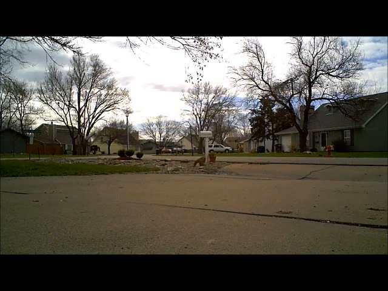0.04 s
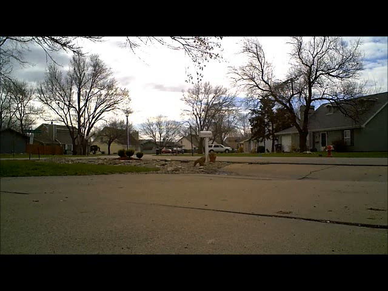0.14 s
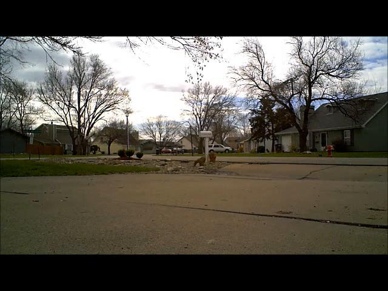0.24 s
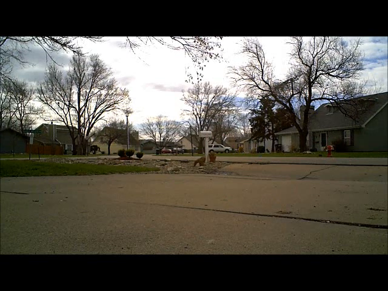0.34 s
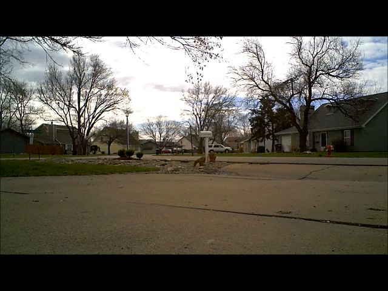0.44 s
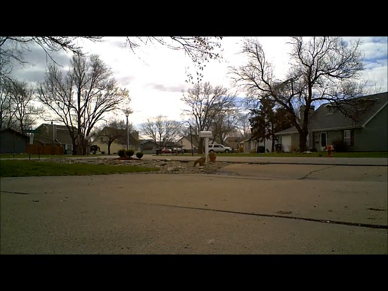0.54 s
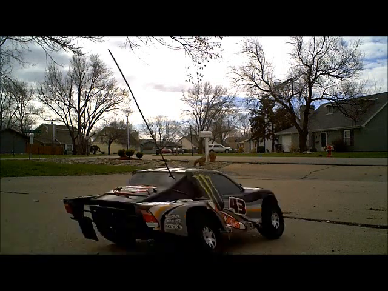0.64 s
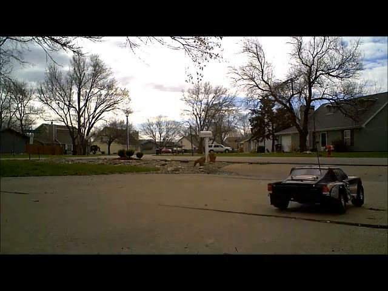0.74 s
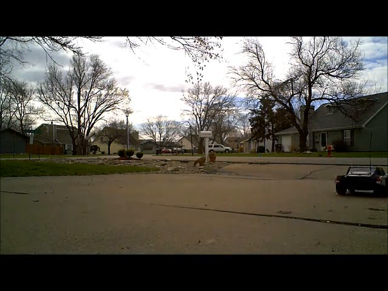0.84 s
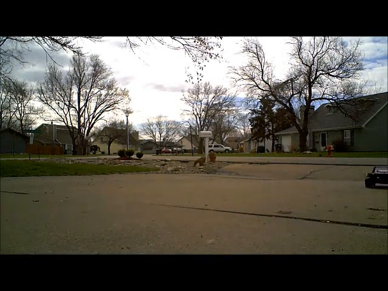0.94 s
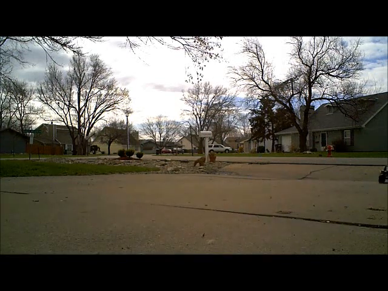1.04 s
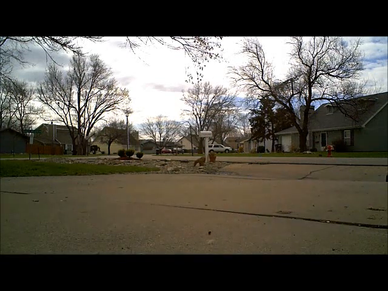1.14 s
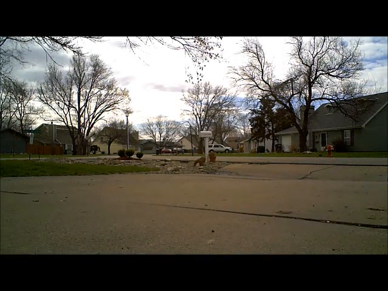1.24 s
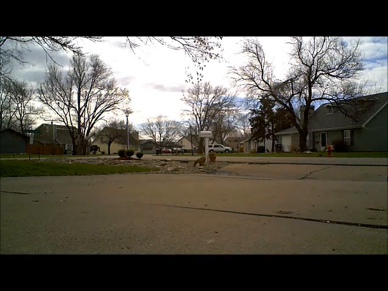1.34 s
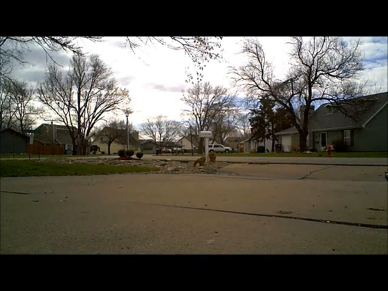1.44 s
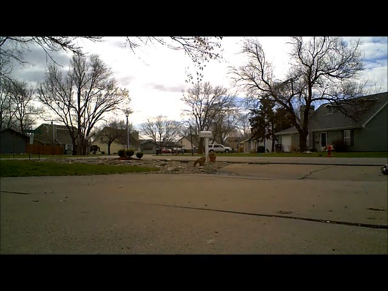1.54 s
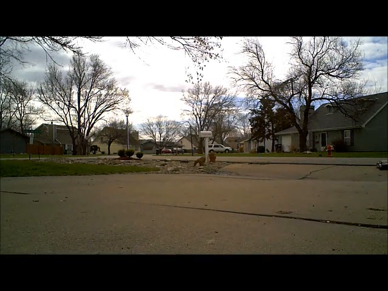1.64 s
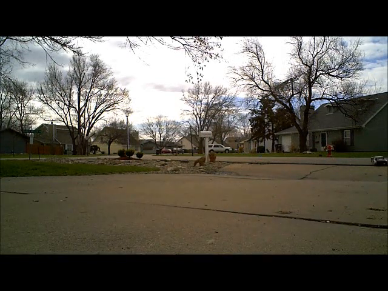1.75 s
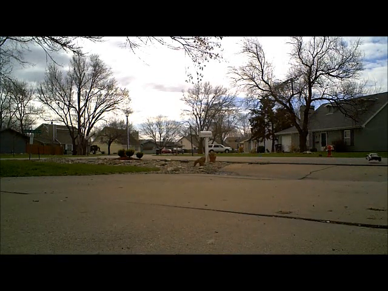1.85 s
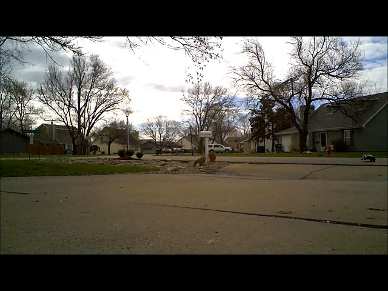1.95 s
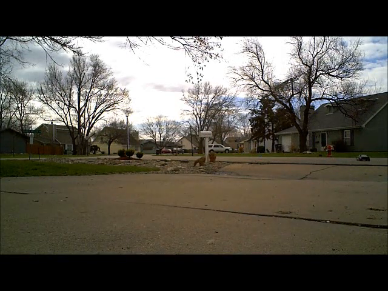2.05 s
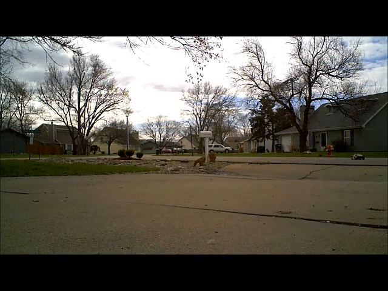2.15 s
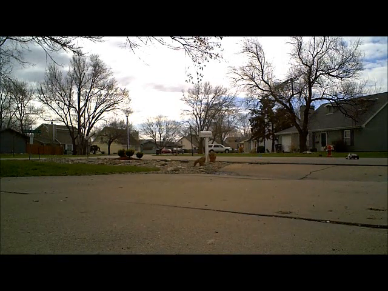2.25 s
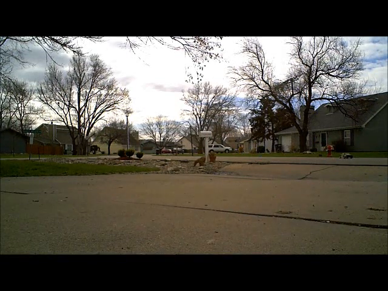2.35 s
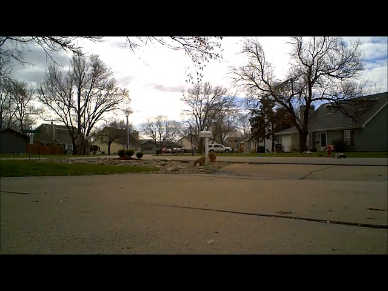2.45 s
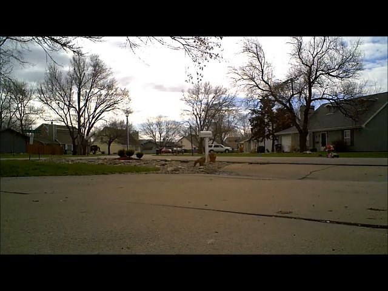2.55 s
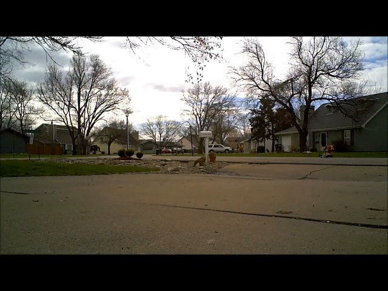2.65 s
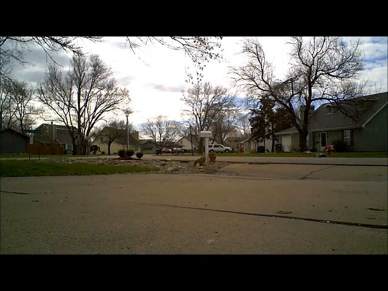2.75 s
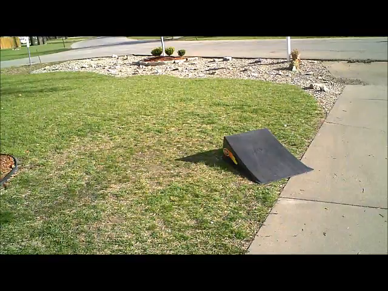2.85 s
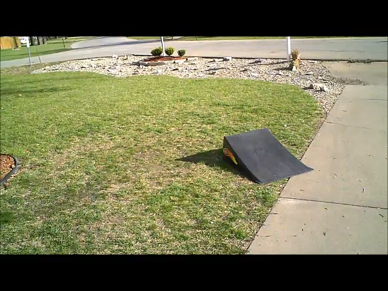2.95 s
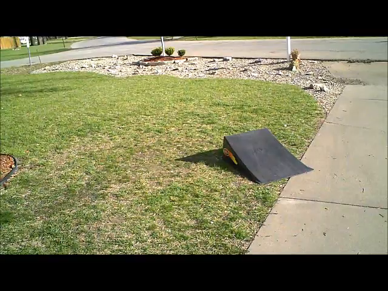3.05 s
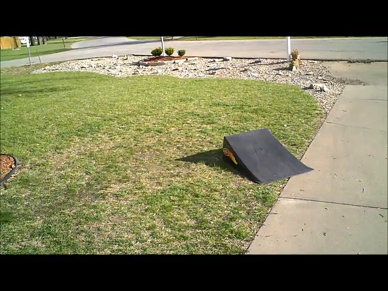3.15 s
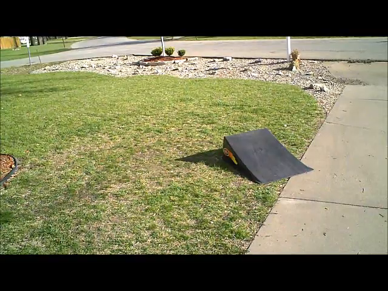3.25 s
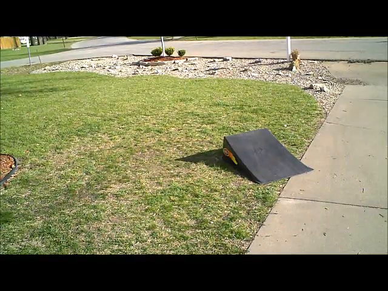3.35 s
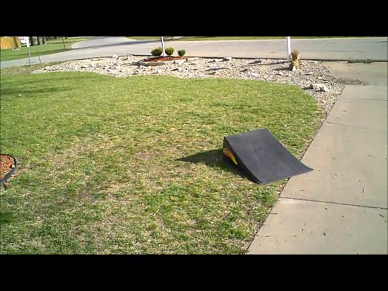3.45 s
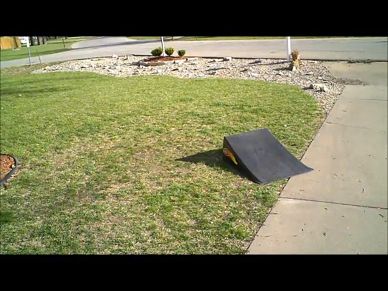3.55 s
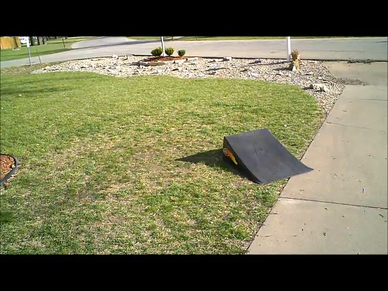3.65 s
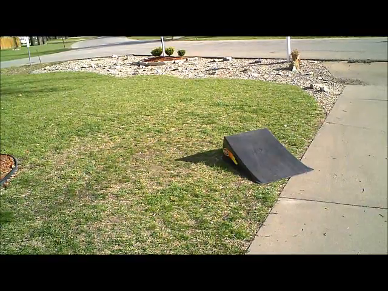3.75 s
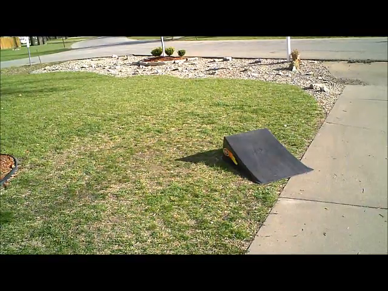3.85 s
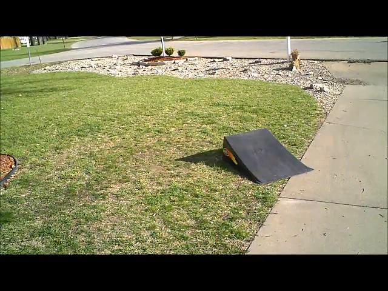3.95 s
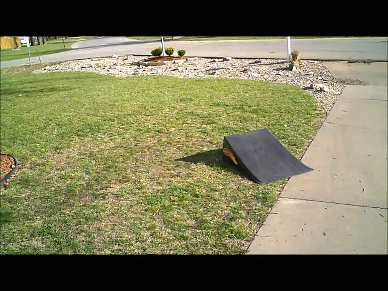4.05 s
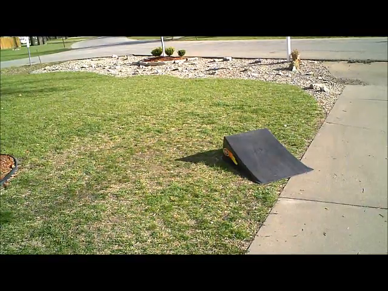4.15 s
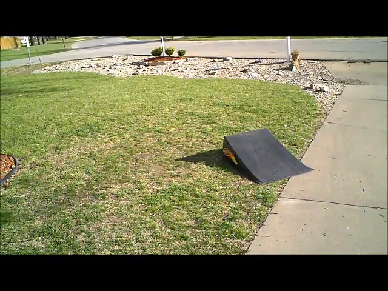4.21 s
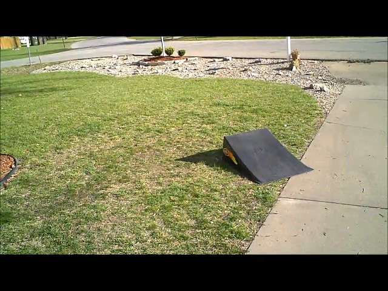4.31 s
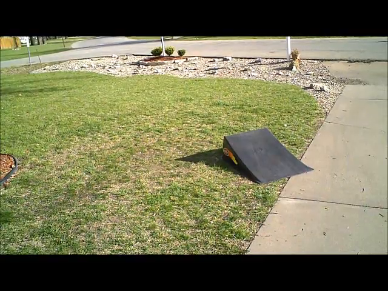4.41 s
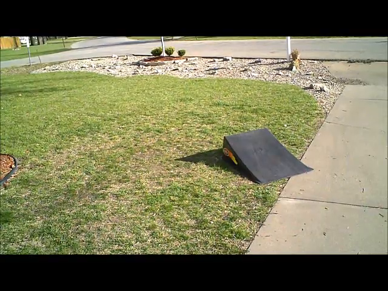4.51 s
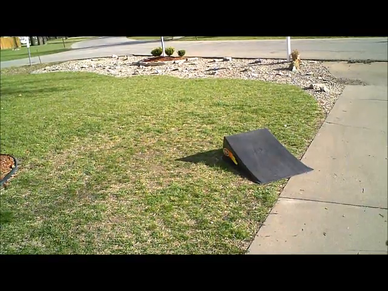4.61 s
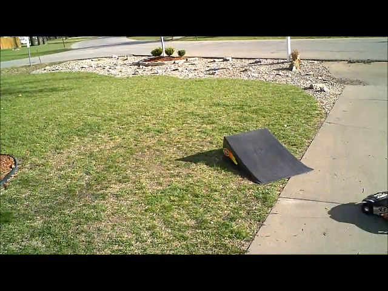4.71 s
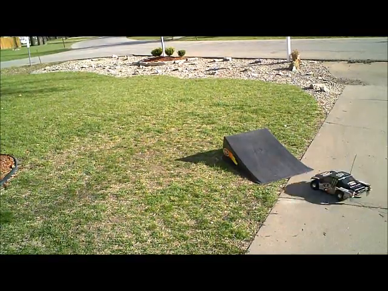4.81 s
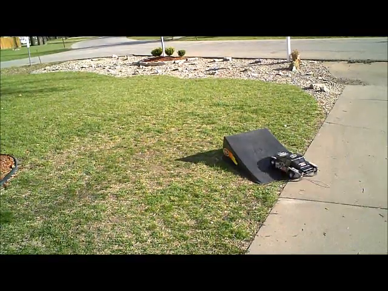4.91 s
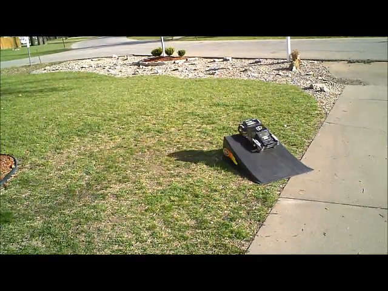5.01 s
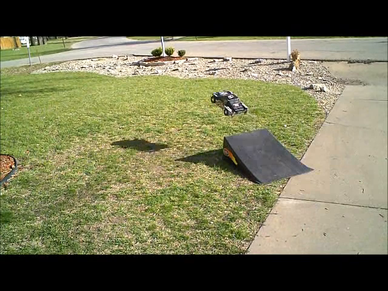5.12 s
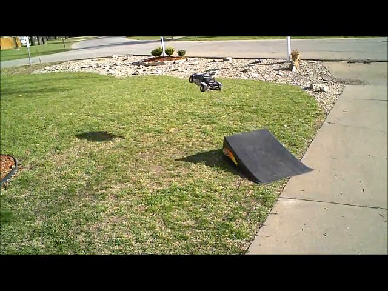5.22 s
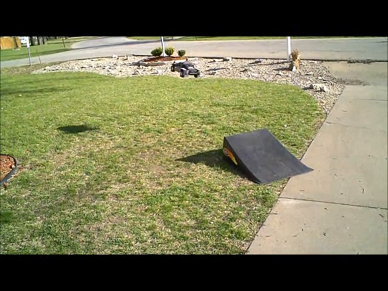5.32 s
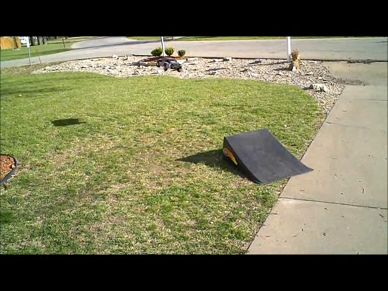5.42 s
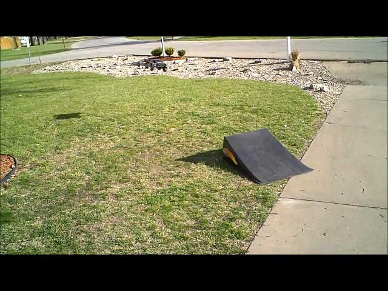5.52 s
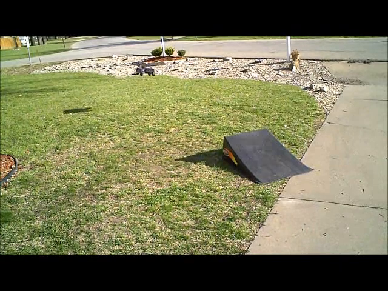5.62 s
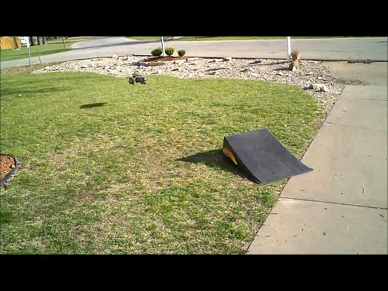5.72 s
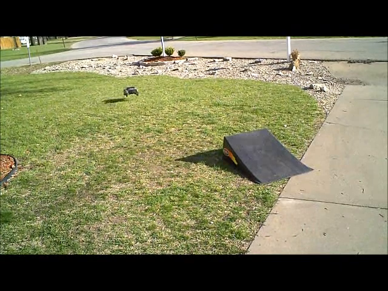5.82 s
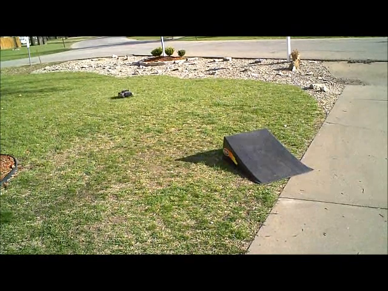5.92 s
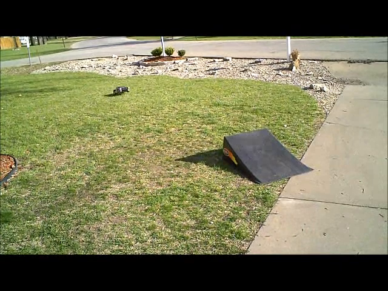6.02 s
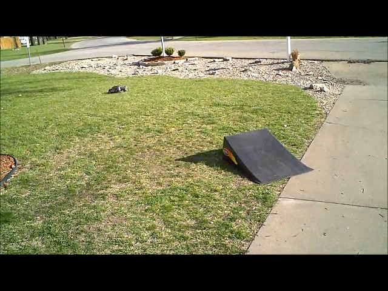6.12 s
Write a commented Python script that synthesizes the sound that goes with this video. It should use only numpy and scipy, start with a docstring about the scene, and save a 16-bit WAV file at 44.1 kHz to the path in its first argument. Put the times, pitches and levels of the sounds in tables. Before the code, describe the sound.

Rising gear whine and tyre roar as a remote-controlled truck races by, rattles away, then speeds up again and jumps a hollow ramp.

```python
"""A gear whine and tyre roar race past and rattle away: a small electric truck on cracked asphalt.
In a second place it accelerates up a drive, hits a plastic ramp, revs in the air and lands on grass.
Gear teeth whine at motor speed, knobbly tyres roar and squeal, the plastic chassis knocks.
Wind puffs on the microphone; a far bird chirps twice."""
import sys
import numpy as np
from scipy import signal
from scipy.io import wavfile
from scipy.ndimage import map_coordinates

SR = 44100
rng = np.random.default_rng(int(sys.argv[2]) if len(sys.argv) > 2 else 0)


def file_out(sig):
    """Save sig as 16-bit WAV at sys.argv[1]."""
    # one column per channel
    cols = np.atleast_2d(sig).T
    # limit, then scale
    lim = np.clip(cols, -1, 1)
    pcm = np.round(lim * 32767).astype(np.int16)
    wavfile.write(sys.argv[1], SR, pcm)


N = 272184
TIME = np.arange(N) / SR
SECOND_PLACE_S = 2.88
MID_MESH_HZ, CUTOFF_HZ = 4000, 15780

# motor speed and tooth load in each run: t/s, mesh f/Hz, load/dB
PASS_BY = [(0, 3687, 5.5), (.17, 3847, 2.5), (.265, 4300, -1), (.298, 5710, 7.5), (.33, 6190, -2),
           (.5, 6830, -14.5), (.62, 6970, -6.5), (.67, 7060, 9), (.74, 7130, 6.5), (.8, 6730, -32.5),
           (.9, 6430, -5), (1.4, 6070, -21)]
RUN_UP = [(3.1, 616.4, -3.5), (3.201, 746.4, 7.5), (3.32, 795, 1), (3.418, 972, 2), (3.47, 1210, 5),
          (3.539, 1278, 3), (3.651, 1494, 4.5), (3.798, 1737, -2), (3.998, 2550, 1.5), (4.13, 2907, 2.5),
          (4.222, 3123, -3), (4.302, 3544, -6.5), (4.421, 3896, -7), (4.601, 4265, -8), (4.899, 4948, -5.5),
          (5.013, 6610, 3.5), (5.054, 4904, -3), (5.109, 5165, -10), (5.159, 5242, 2.5), (5.201, 5500, -48)]
AIRBORNE = [(5.329, 2597, -11), (5.376, 3293, 6), (5.42, 4190, -5), (5.461, 4676, -10), (5.55, 3610, -34),
            (5.632, 3630, -1.5), (5.799, 4515, 0), (5.97, 4420, -12)]
# rolling truck, near or far: t/s, level/dB, treble level/dB
ROLLING = [(0, -52, -72), (.17, -50.5, -68.5), (.26, -44, -64.5), (.46, -38.5, -50.5), (.6, -34.5, -42.5),
           (.72, -32.5, -26.5), (.79, -33.5, -37.5), (.84, -42, -51), (1.06, -47.5, -54.5),
           (1.42, -53, -59), (1.75, -52.5, -67), (2.25, -61, -80.5), (2.88, -64.5, -77.5),
           (3.6, -60, -76.5), (3.93, -54, -63.5), (4.56, -50, -56), (4.9, -49, -52.5), (5.09, -44.5, -46.5),
           (5.16, -48, -52), (5.21, -56.5, -66), (5.3, -61, -66), (5.39, -54, -56.5), (5.5, -58.5, -64),
           (5.95, -60.5, -65.5), (6.0, -54, -53.5), (6.17, -62.5, -96)]


def amp(db):
    """dB to gain."""
    return 10 ** (np.asarray(db) / 20)


def unit_rms(x):
    """Scale to rms 1."""
    return x / np.sqrt(np.mean(x ** 2) + 1e-20)


def butter(x, hz, kind, order=2):
    """Butterworth filter."""
    return signal.sosfilt(signal.butter(order, hz, kind, fs=SR, output="sos"), x)


def curves(rows):
    """Columns after t/s, interpolated to every sample."""
    s, *columns = np.transpose(rows)
    return [np.interp(TIME, s, column) for column in columns]


def gate(rows, fade_s=0.13):
    """1 while a curve lasts, fading beyond its ends."""
    return np.clip(np.minimum(TIME - rows[0][0] + fade_s, rows[-1][0] + fade_s - TIME) / fade_s, 0, 1)


def bumps(rows):
    """Sum of smooth humps: centre/s, length/s, height."""
    return sum(height * np.sin(np.pi * np.clip((TIME - s) / length_s + .5, 0, 1)) ** 2
               for s, length_s, height in rows)


def wander(rate_hz):
    """Smooth random curve, spread about 1."""
    steps = np.cumsum(np.broadcast_to(np.clip(rate_hz, 1, 3000), N)) / SR
    return map_coordinates(rng.standard_normal(20000), [steps + 5], order=3)


def ring(clicks, hz, t60_s):
    """One mode: a unit click rings a decaying sine of height 1."""
    r, w = amp(-60 / (t60_s * SR)), 2 * np.pi * hz / SR
    return signal.lfilter([0, np.sin(w)], [1, -2 * r * np.cos(w), r * r], clicks + 1e-18)


def blurred_tone(hz, width_hz, clean):
    """Tone with a steady power share `clean`; the rest scatters in level and phase."""
    phasor = np.exp(2j * np.pi * np.cumsum(hz) / SR)
    scatter = (wander(width_hz) + 1j * wander(width_hz)) / np.sqrt(2)
    tone = np.sqrt(2) * np.real(phasor * (np.sqrt(clean) + np.sqrt(1 - clean) * scatter))
    return tone * (hz < CUTOFF_HZ)


def banded(spectrum, source, flicker_db):
    """Grains through ten flickering bands; rms 1."""
    hz, db = np.transpose(spectrum)
    common, out = wander(45), 0
    edges_hz = np.geomspace(hz[0], hz[-1], 11)
    for k, (low, high) in enumerate(zip(edges_hz, edges_hz[1:])):
        band = butter(source[k % 2], [low, high], "band")
        level_db = np.interp(np.log(low * high) / 2, np.log(hz), db)
        out += band * amp(level_db + flicker_db * (common + .4 * wander(15)))
    return unit_rms(out)


def resonant(peaks, source, flicker_db):
    """Grains twice through each flickering resonance; rms 1."""
    common, out = wander(70), 0
    for k, (hz, width_hz, db) in enumerate(peaks):
        t60_s = np.log(1000) / (np.pi * width_hz * 1.3)
        peak = ring(ring(source[k % 2], hz, t60_s), hz, t60_s)
        out += unit_rms(peak) * amp(db + flicker_db * (common + 0.92 * wander(4.366)))
    return unit_rms(butter(out, .6 * peaks[0][0], "high"))


def passed(level_at_s=0.73, turn_s=0.064):
    """0 while the truck approaches, 1 once it shows its tail."""
    return (1 + np.tanh((TIME - level_at_s) / turn_s)) / 2


def gears(run, partials, blurs, idler_db=None):
    """Mesh tone, harmonics and slower gears follow the motor; slow teeth ring clear, fast ones scatter."""
    # wheels lose grip, motor races: centre/s, rise/share of speed, length/s
    skips = [(0.541, 0.078, 0.057), (0.591, 0.057, 0.061), (0.679, 0.058, 0.1), (0.772, 0.24, 0.054),
             (3.365, .2, 0.048), (3.583, 0.077, 0.048), (3.88, 0.0632, 0.07), (3.958, 0.0528, 0.0524),
             (4.215, 0.074, 0.052), (4.549, 0.088, 0.11), (5.125, 0.29, 0.071)]
    # gear case response: f/Hz, gain/dB
    case = [(1000, 10.5), (1550, 10.5), (2000, -8), (2600, -2), (3000, 4.5), (3700, 0.5), (4200, 0.5),
            (4800, 2), (5600, -0.5), (7300, 3.5), (9500, -3), (14000, -26)]
    # slow motor cogs, teeth let go: centre/s, length/s, dip/dB
    cogging = [(3.165, 0.09, -18), (3.245, 0.1, -26), (3.335, 0.024, -17), (3.39, 0.023, -7),
               (3.44, 0.069, -11)]
    mesh_hz, load_db = curves(run)
    racing = 1 + bumps([(s, length_s, rise) for s, rise, length_s in skips])
    mesh_hz = mesh_hz * racing * (1 + .019 * wander(80))
    case_hz, case_db = np.transpose(case)
    level_db = curves(ROLLING)[0] + bumps(cogging)
    clean = np.clip(1.2 * (1 - mesh_hz / 2400), .05, .75)
    speed = np.minimum(mesh_hz / MID_MESH_HZ, 1.4)
    out = 0
    for (ratio, db, db_per_octave), blur in zip(partials, blurs):
        hz = ratio * mesh_hz
        drive_db = load_db if ratio >= 1 or idler_db is None else idler_db
        speed_db = db_per_octave * np.log2(mesh_hz / MID_MESH_HZ)
        colour_db = np.interp(np.log(hz), np.log(case_hz), case_db)
        bite_db = (1.8 + 1.1 * speed) * wander(60) + 1.2 * ratio * wander(16)
        tone = blurred_tone(hz, 40 + blur * speed * hz, clean)
        out += amp(level_db + db + drive_db + speed_db + colour_db + bite_db) * tone
    return gate(run) * out


def grains(per_s, spread_db):
    """Tread blocks or grit: random clicks over noise, two independent rows."""
    sizes = amp(spread_db * np.minimum(rng.exponential(1, (2, N)), 5)) * rng.choice([-1, 1], (2, N))
    clicks = sizes * (rng.random(N) < per_s / SR)
    return unit_rms(clicks) + 0.61 * rng.standard_normal((2, N))


def wheel_throb_db(teeth_per_turn=100):
    """An uneven wheel throbs once a turn, deeper at speed."""
    mesh_hz = curves(PASS_BY + RUN_UP + AIRBORNE)[0]
    turns = np.cumsum(mesh_hz / teeth_per_turn * (1 + 0.18 * wander(22))) / SR
    depth_db = 6.5 * np.minimum(mesh_hz / MID_MESH_HZ, 1) * np.clip(1 + 0.45 * wander(17), 0, 3)
    return depth_db * (np.cos(np.pi * turns) ** 4 - 3 / 8)


def tyres():
    """Hollow tyres roar and hiss, the chassis growls, grit rings the shell, the gear case rasps."""
    # tyre spectra: f/Hz, density/dB
    roar_spectrum = [(120, -25.5), (300, -2.5), (550, 2.5), (800, 6.5), (1000, 0.5), (1400, -43)]
    hiss_spectrum = [(5000, 1), (7000, 0.5), (9000, -7), (11000, -11), (13000, -16), (16000, -12)]
    # roar swells at closest point, hollow ramp, landing: centre/s, length/s, gain/dB
    swells = [(.64, 0.52, 6.5), (4.5, 1, 8.5), (5.1, 0.68, 14), (6.01, 0.12, 8.5)]
    # resonances of chassis, shell, gear case, gear case from behind: f/Hz, nominal width/Hz, level/dB
    chassis_peaks = [(946, 270, 1), (1289, 310, 2), (1633, 370, 0)]
    shell_peaks = [(2160, 940, 7.5), (2610, 390, 5), (2763, 180, 2), (3400, 960, 7), (3850, 2300, 8)]
    case_peaks = [(4700, 2800, 9), (5535, 480, 2)]
    rear_peaks = [(3890, 540, 8.5), (5400, 420, 8), (6820, 500, -2)]
    level_db, treble_db = curves(ROLLING)
    on_drive = TIME > SECOND_PLACE_S
    behind = passed() * ~on_drive
    tread, sand = grains(per_s=1000, spread_db=1.5), grains(per_s=2800, spread_db=2.0)
    throb_db = wheel_throb_db() * np.where(on_drive, .4, 1)   # the drive is smoother

    far_rumble_db = np.where(on_drive, -56, -61)
    roar_gain = np.hypot(amp(level_db - 3.5 + bumps(swells)), amp(far_rumble_db))
    facing_db = np.where(on_drive, -3.5, 6 - 14 * passed())
    growl_gain = roar_gain * amp(facing_db) * unit_rms(amp(0.34 * throb_db))
    rasp_gain = amp(0.45 * level_db + 0.55 * treble_db + 4.5) * unit_rms(amp(0.68 * throb_db))
    hiss_gain = amp(treble_db) * unit_rms(amp(throb_db))

    front_rasp = amp(-4 * on_drive) * resonant(case_peaks, sand[::-1], flicker_db=3)
    rear_rasp = amp(-6) * resonant(rear_peaks, sand[::-1], flicker_db=5)
    return (roar_gain * banded(roar_spectrum, tread, flicker_db=1)
            + growl_gain * resonant(chassis_peaks, tread[::-1], flicker_db=1)
            + amp(level_db) * resonant(shell_peaks, sand, flicker_db=2)
            + rasp_gain * ((1 - behind) * front_rasp + behind * rear_rasp)
            + hiss_gain * banded(hiss_spectrum, sand, flicker_db=2))


def wind():
    """Gusts on the microphone: lumpy low noise."""
    # gusts in each place: t/s, level/dB
    street_gusts = [(.4, -84.5), (.7, -70), (1.0, -82.5), (2.4, -76)]
    drive_gusts = [(2.9, -66), (3.03, -59), (3.6, -69.5), (4.33, -75), (4.4, -64), (4.49, -50), (4.53, -78),
                   (5.1, -52), (5.5, -67.5), (6.17, -59)]
    rumble = butter(rng.standard_normal(N), [90, 300], "band")
    level_db = np.where(TIME > SECOND_PLACE_S, curves(drive_gusts)[0], curves(street_gusts)[0])
    return amp(level_db) * unit_rms(rumble * amp(5 * wander(14)))


def knocks():
    """Each knock strikes every chassis mode with its own strength; sharp ones reach the shell."""
    # knocks: t/s, relative level/dB, brightness/dB, chassis tilt/(dB/octave)
    hits = [(0.138, -28.5, -6.5, 14.5), (0.384, -29.5, -24, 21), (0.404, -27, -28, 12),
            (0.436, -25.5, -22, 21.5), (0.455, -27, -12, 8), (0.472, -16.5, -29, 16),
            (0.505, -26.5, -26, 26), (0.822, -17.5, -34, 1), (0.87, -29.5, -9, 5), (0.914, -22, -16, 3),
            (1.043, -36, -6, -2), (1.448, -35, -6, 6), (1.481, -32.5, -5, -4), (1.521, -33, -20, 4),
            (1.823, -35.5, -20, -8), (1.898, -26.5, -16.5, 6.5), (1.975, -35.5, -26, 5),
            (2.001, -38, -22, 1), (2.054, -42, -24, 5), (2.08, -37.5, -10, 2), (2.115, -32, -8.5, 0),
            (4.981, -25.5, -17, 7), (2.987, -38, -20, 0), (3.143, -32, -18, 9), (3.896, -36, -30, -2),
            (5.384, -33.5, -20, 6), (5.993, -31.5, -3.5, -3)]
    # modes of chassis and thin shell: f/Hz, level/dB, t60/s
    chassis_modes = [(366, 0.5, 0.023), (575, 2.5, 0.011), (814, 4.5, 0.021), (1182, 1, 0.02),
                     (1589, -6.5, 0.022)]
    shell_modes = [(2050, 5, 0.0043), (2856, -5, 0.013), (3600, -2, 0.0055), (5500, 1, 0.00031)]
    modes = chassis_modes + shell_modes
    s, hit_db, bright_db, tilt = np.transpose(hits + rattles())
    scatter_db = rng.normal(0, 2.0, (len(s), len(modes)))
    out = np.zeros(N)
    for k, (hz, mode_db, t60_s) in enumerate(modes):
        colour_db = tilt * np.log2(hz / 850) if k < len(chassis_modes) else bright_db + 12
        clicks = np.zeros(N)
        clicks[(s * SR).astype(int)] = amp(hit_db + mode_db + scatter_db[:, k] + colour_db - 7.5)
        out += (-1) ** k * ring(clicks, hz, t60_s)
    return butter(out, 250, "high")   # a small body gives no bass


def squeal():
    """Rubber sticks and slips over a joint and on the ramp."""
    # squeals: t/s, length/s, f/Hz, level/dB of harmonics 1, 2, 3
    bursts = [(0.195, 0.072, 854, -40, -60, -51), (4.541, 0.017, 2454, -34, -39, -50),
              (5.048, 0.028, 779, -22.5, -33, -30.5), (5.062, 0.05, 799, -20.5, -25.5, -38),
              (5.142, 0.018, 766, -22, -26.5, -34)]
    out = np.zeros(N)
    for s, length_s, hz, *levels_db in bursts:
        swell = np.sin(np.pi * np.clip((TIME - s) / length_s, 0, 1)) ** 2
        for harmonic, db in enumerate(levels_db, 1):
            out += swell * amp(db) * np.sin(2 * np.pi * harmonic * hz * TIME)
    return out


def swish():
    """A noise band falls as the truck goes by."""
    # band centre: t/s, f/Hz, level/dB
    sweep = [(.73, 4400, -40.5), (.83, 2197, -50)]
    hz, db = curves(sweep)
    return gate(sweep, fade_s=.03) * amp(db) * blurred_tone(hz, width_hz=700, clean=0)


def rattles(count=80):
    """Rows for knocks(): showers of small hits, each strongest in its middle."""
    # clatter on cracks, ramp, landing: t/s, length/s, relative level/dB, brightness/dB
    showers = [(1.476, 0.082, -35, -2), (1.787, 0.14, -29.5, -6.5), (2.089, 0.16, -38, -9),
               (3.093, 0.22, -35.5, -27), (5.017, 0.15, -40, 10.5), (5.961, 0.097, -33, -11.5)]
    hits = []
    for s, length_s, db, bright_db in showers:
        places = rng.random(count)
        scatter_db = np.minimum(rng.exponential(1.65, count), 10)
        levels_db = db - 11 + scatter_db + 10 * np.log10(np.sin(np.pi * places))
        hits += [(s + length_s * place, hit_db, bright_db, 0) for place, hit_db in zip(places, levels_db)]
    return hits


def bird():
    """Short, rough falling notes from afar."""
    # notes: t/s, start f/Hz, end f/Hz, length/s, level/dB
    chirps = [(2.186, 3320, 3040, 0.046, -51.5), (2.823, 3330, 3300, 0.056, -51)]
    out = np.zeros(N)
    for s, start_hz, end_hz, length_s, db in chirps:
        progress = np.clip((TIME - s) / length_s, 0, 1)
        note = blurred_tone(start_hz + (end_hz - start_hz) * progress, width_hz=900, clean=.05)
        out += amp(db) * np.sin(np.pi * progress) ** 2 * note
    return out


def thumps(rise_s=0.00069):
    """A thump as the scene changes, wind puffs and the hollow ramp: low swings that swell and die."""
    # thumps: t/s, relative level/dB, f/Hz, t60/s
    pushes = [(2.884, -51, 460, 0.023), (4.37, -44.5, 178.5, 0.018), (4.398, -44, 332, 0.019),
              (4.987, -38.5, 250, 0.022), (4.992, -38, 491, 0.083), (5.031, -35.5, 253, 0.045),
              (5.828, -40, 257, 0.016), (5.946, -51, 224, 0.029), (5.978, -49.5, 431, 0.091)]
    out = np.zeros(N)
    for s, db, hz, t60_s in pushes:
        age_s = np.clip(TIME - s, 0, None)
        envelope = amp(db + 14.5 - 60 * age_s / t60_s) * (1 - np.exp(-age_s / rise_s))
        out += envelope * np.sin(2 * np.pi * hz * age_s)
    return butter(out, 90, "high")


def controller_whistle():
    """The speed controller makes the motor windings whistle at part throttle."""
    # switching tone: t/s, f/Hz, level/dB
    switching = [(3.3, 8020, -84), (3.95, 8020, -80)]
    hz, db = curves(switching)
    return gate(switching) * amp(db) * blurred_tone(hz, width_hz=20, clean=0.73)


def whirr():
    """Gear noise rings case and shell resonances in turn on the run-up."""
    # resonances: f/Hz, nominal width/Hz, level re rolling/dB, centre/s, length/s
    peaks = [(1262, 97, 6, 3.96, 0.93), (1506, 110, -1, 3.97, 0.69), (2880, 280, 2, 4.4, 1),
             (5660, 350, -4, 4.52, 1)]
    noise = rng.standard_normal((1, N))
    out = 0
    for hz, width_hz, db, s, length_s in peaks:
        out += bumps([(s, length_s, amp(db))]) * resonant([(hz, width_hz, 0)], noise, flicker_db=2)
    return amp(curves(ROLLING)[0]) * out


def echoes(x):
    """Add a ground bounce and two house-front echoes, all dulled."""
    dull, out = signal.lfilter([.4], [1, -.6], x), x.copy()
    for lag_s, db in [(.004, -13.5), (.017, -11), (.043, -8.5)]:
        lag = int(lag_s * SR)
        out[lag:] += amp(db) * dull[:N - lag]
    return out


def scene():
    """Truck, wind, bird and hiss at one microphone."""
    # gear partials (ratio < 1: axle, idlers): f/mesh f, level at mid speed/dB, slope/(dB/octave)
    pass_partials = [(1, -11, 14), (2, -19.5, -7.5), (.45, -5, -8), (.23, -21, 9), (.675, -9, 0)]
    run_up_partials = [(1, 2, 0.43), (2, -0.5, 2.5), (3, -9.5, 1), (.655, -22, 22)]
    air_partials = [(1, -3, 23), (2, -7, -10)]
    passing = gears(PASS_BY, pass_partials, blurs=[.085, .06, .06, .12, .025], idler_db=-22 * passed())
    passing += swish()
    running = gears(RUN_UP, run_up_partials, blurs=[.055, .085, .13, .04])
    flying = gears(AIRBORNE, air_partials, blurs=[.3, .13]) * unit_rms(amp(1.5 * wheel_throb_db()))
    ambience = wind() + thumps() + bird() + amp(-76) * rng.standard_normal(N)
    body = echoes(passing + running + flying + whirr() + knocks())
    return (body + controller_whistle() + tyres() + squeal() + ambience)[None]


def record(dry):
    """A small microphone loses deep bass, rounds peaks and cuts the top."""
    thin = butter(dry, 45, "high", order=1)
    rounded = .48 * np.tanh(thin / .48)
    return signal.sosfilt(signal.cheby2(20, 80, CUTOFF_HZ, fs=SR, output="sos"), rounded)


dry = scene()
out = record(dry)
file_out(out)
```